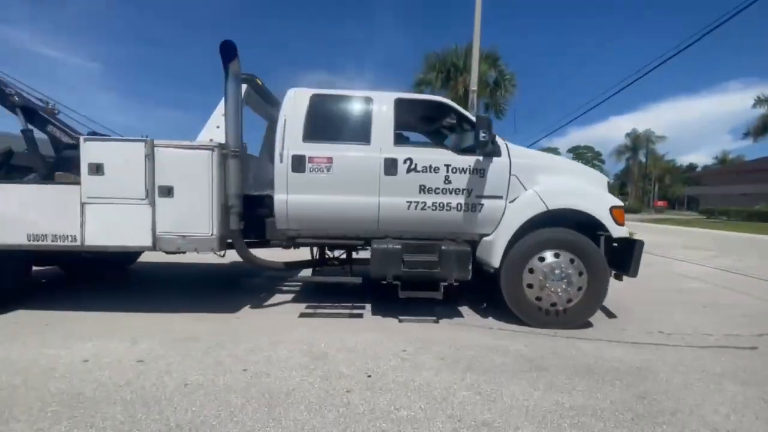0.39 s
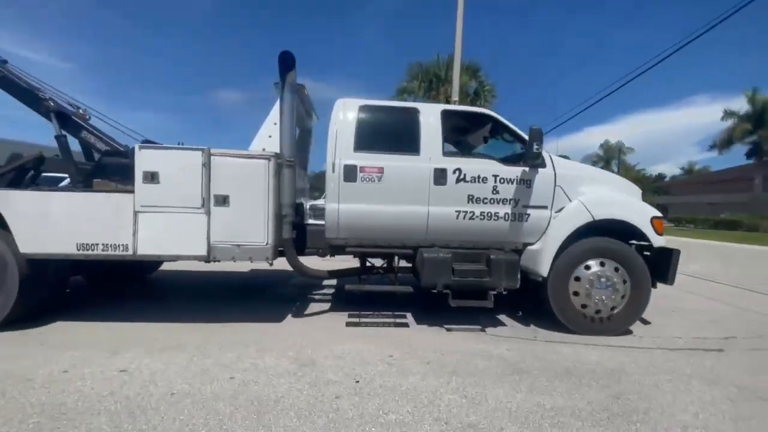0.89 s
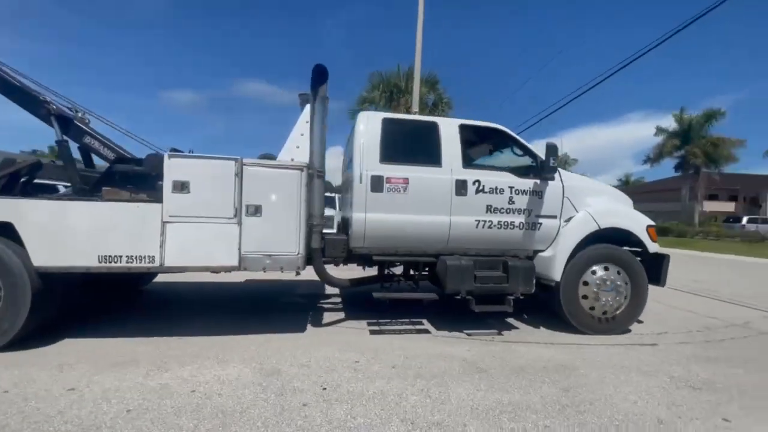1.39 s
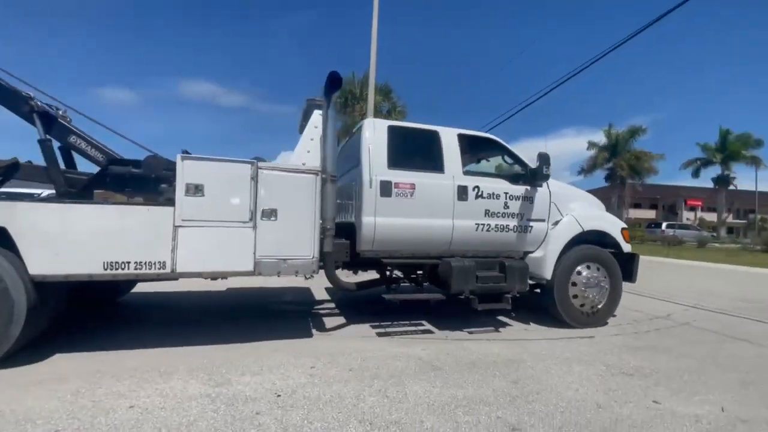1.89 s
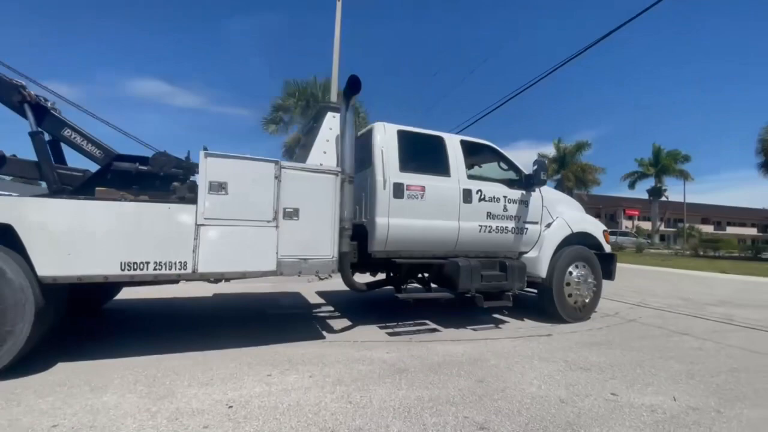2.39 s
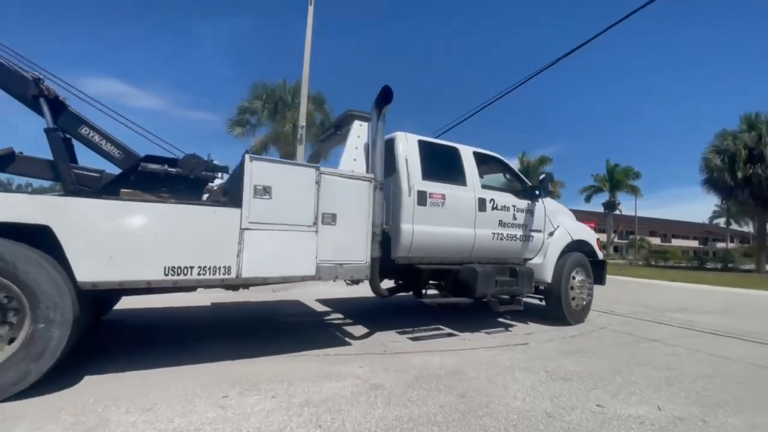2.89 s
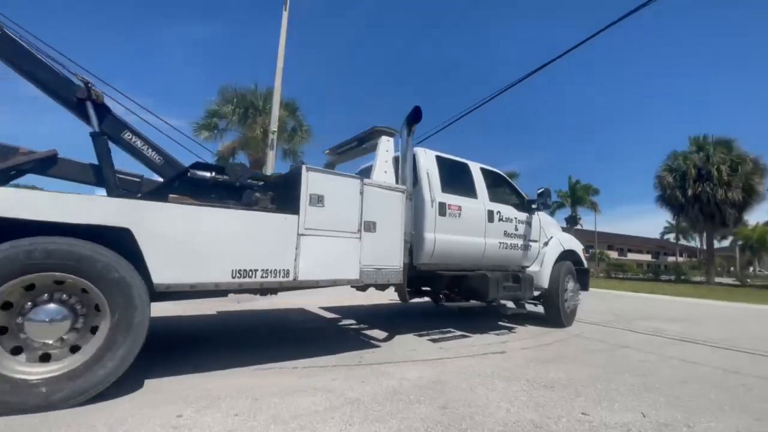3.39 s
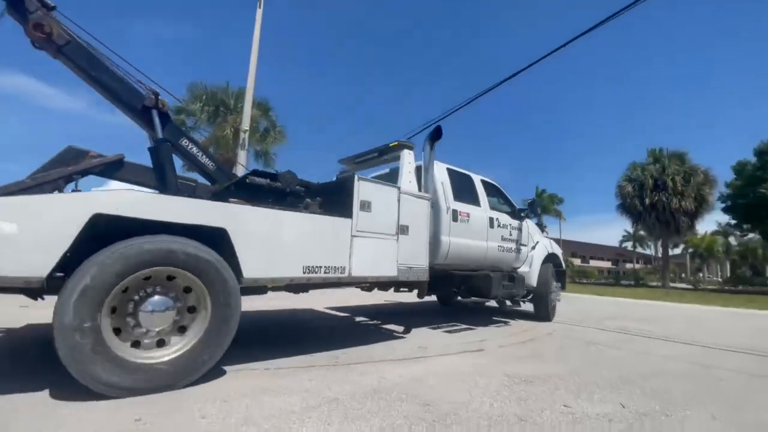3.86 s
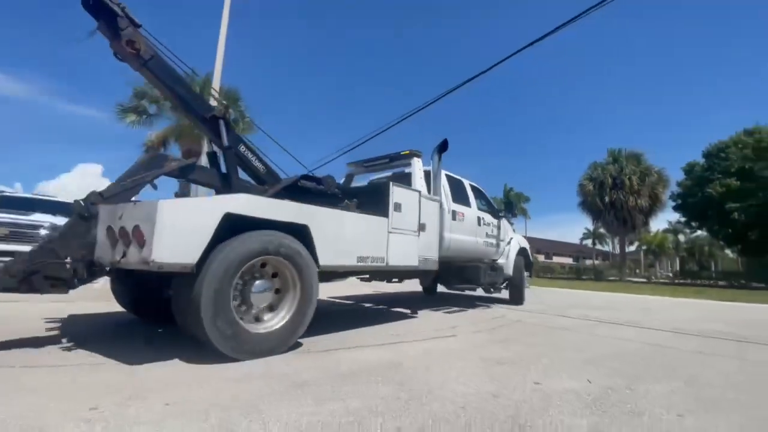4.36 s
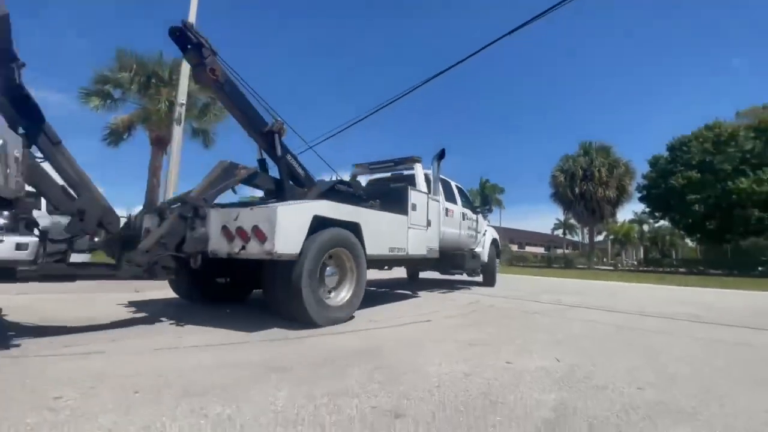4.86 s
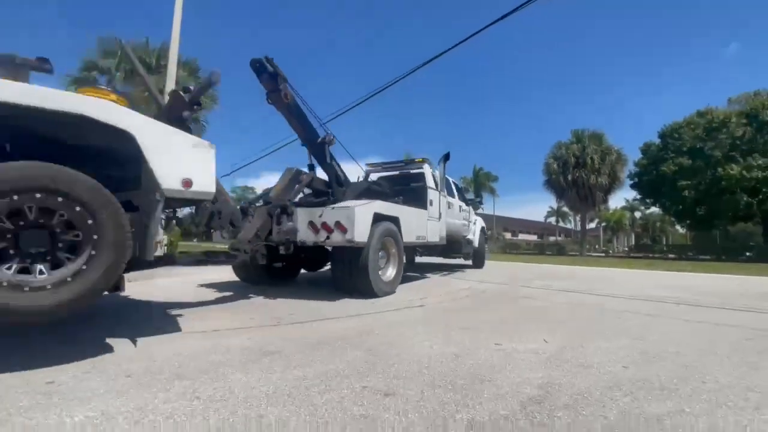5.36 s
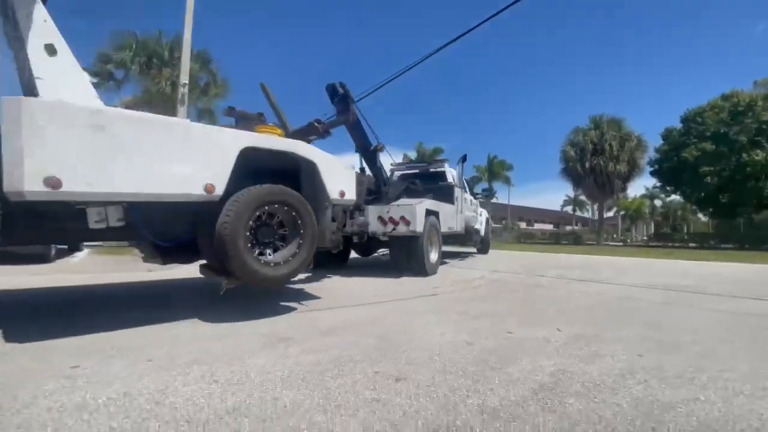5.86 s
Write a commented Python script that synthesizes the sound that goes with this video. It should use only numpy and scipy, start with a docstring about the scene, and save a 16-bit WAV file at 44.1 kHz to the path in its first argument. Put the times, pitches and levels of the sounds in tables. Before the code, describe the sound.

Close diesel truck clatters along with a thin turbo whistle and small chassis squeaks, then accelerates off, its growl climbing in pitch before fading slightly.

```python
"""A six-cylinder diesel truck rolls slowly past on a concrete road: hum of low engine orders, exhaust puffs,
combustion knock ringing the block, rattle, valve ticks, noise hiss and a turbo whine near 3.5 kHz.
Short chassis squeaks and clinks come at 1.6-2.5 s, one more clink at 4.1 s. From about 2.9 s the engine
pulls away under load: firing rate and whine climb, road-echo notches sweep up, and the level falls at the end.
A two-port phone microphone hears it directly and through scattering."""
import sys
import numpy as np
from scipy import signal
from scipy.fft import rfft, irfft, next_fast_len
from scipy.io import wavfile
from scipy.ndimage import uniform_filter1d

SR = 44100
rng = np.random.default_rng(int(sys.argv[2]) if len(sys.argv) > 2 else 0)


def dump_mix(stems):
    """Bounce the given channels to the path in sys.argv[1] as a 16-bit WAV at rate SR."""
    frames = np.atleast_2d(stems).T  # one column per channel
    limited = np.clip(frames, -1, 1)  # hard clip at full scale
    pcm = np.round(limited * 32767).astype(np.int16)
    wavfile.write(sys.argv[1], SR, pcm)


def to_linear_factor(level_db):
    """Convert decibel levels (scalar or array-like) to linear amplitude factors."""
    exponent = np.asarray(level_db, float) / 20
    return 10 ** exponent


N = 275625
T = np.arange(N) / SR
SIZE = next_fast_len(N + SR // 4)
HZ = np.maximum(np.arange(SIZE // 2 + 1) * SR / SIZE, 1)
JITTER_S = .0003   # spread of the click timing

# Engine speed. Each row: time in seconds, firings per second.
FIRINGS_PER_S = [(0.0, 37.2), (0.15, 38.935), (0.75, 40.561), (1.2, 40.365), (1.35, 42.083), (1.8, 41.116),
                 (2.1, 44.534), (2.4, 39.877), (2.85, 44.307), (3.15, 50.28), (3.45, 51.558), (3.6, 53.012),
                 (4.05, 61.85), (4.5, 67.373), (4.8, 72.764), (5.25, 78.639), (5.55, 81.527),
                 (6.25, 86.526)]
# Truck path. Each row: time in seconds, first notch of the road echo in Hz, firings by which the knock
# trails the exhaust (negative: leads), view (0 beside, 1 passing, 2 behind).
TRUCK_PATH = [(0, 133, -0.0037, 0), (1, 128, -0.0041, 0), (2.5, 142.8, 0.036, 0.19),
              (3.1, 158, -0.26, 0.57), (3.4, 176, -.38, 0.87), (3.95, 224, -.6, 1.09),
              (4.3, 270, -.75, 1.46), (4.7, 340, -0.89, 2.18), (5, 393, -1.02, 2.23),
              (6.25, 480, -0.9, 1.87)]
# Engine effort, falling with distance at the end. Each row: time in seconds, level in dB.
EFFORT_DB = [(0, 2), (.07, -2.5), (.54, 3.5), (1.51, -0.5), (1.95, 3.5), (2.39, -0.5), (2.49, 6.5),
             (2.68, -1), (3.1, 5.5), (3.5, 3.5), (3.88, 1.1), (4.21, 2), (4.49, 6), (5.01, 6.5), (5.64, 0),
             (6.0, -5.5), (6.25, -6.5)]
# Layers in the order puff, knock, rattle, clatter, hiss. Each row: level in dB beside, passing, behind,
# share of the effort followed.
LAYER_LEVELS = [(-28, -20.5, -25.5, 0.18), (-26.5, -21.5, -25.5, 0.65), (-28, -27, -30.5, 0.38),
                (-31.5, -34, -40, 0.63), (-29.5, -30, -33.5, 0.56)]
# Cylinder strengths. Each row: relative knock in dB beside, passing, behind, relative exhaust puff in dB,
# relative valve tick in dB before the view evens it.
CYLINDER_STRENGTHS = [(-6, 0, 0, 0, -12), (-4.5, -11, -9, -5, -10), (-2.5, -8, -2, -4, -12),
                      (-8, -10, -6, -7, -1), (-3.5, -13, -9, -1, 0), (0, -2.5, -2, -6, -8)]
# Deeper knock by cylinder. Each row: relative level in dB beside, passing, behind.
DEEP_KNOCK_STRENGTHS = [(0, 0, 0), (-8, -11, -7), (-2.5, -9, -3.5), (-8, -13, -8), (-10, -13, -12),
                        (-2.5, -3, -1.5)]

# Hum orders. Each row: multiple of the firing rate, phase in radians, turns of phase slip as the truck passes.
HUM_ORDERS = [(1, -.2, 0), (1.5, .7, .35), (2, -.3, 1.1), (2.5, 1.8, .6), (3, 3, .95), (3.5, 2.5, 0),
              (4, -2.6, 1.9), (4.5, 1.1, 2.2), (8 / 3, 0, 0), (17 / 6, 2.2, 0), (19 / 6, -2.5, 0)]
# Hum levels, rows as in HUM_ORDERS. Each row: level in dB beside, passing, behind, waver in dB (held to 0..3).
HUM_LEVELS = [(-38, -14.5, -19.5, 1.4), (-36, -40, -46, 3.5), (-23.5, -30, -24, 1.2),
              (-40.5, -38, -43, 4.5), (-28.5, -31.5, -22.5, 0.8), (-39.5, -37, -31.5, 2.5),
              (-38, -46.5, -47, 3.5), (-54, -40, -54, 0), (-53, -47, -47, 8), (-65, -62, -35, -4),
              (-40, -34.5, -38.5, 4)]
# Brief dips and swells of one order. Each row: middle in seconds, multiple of the firing rate,
# half-length to 1/e in seconds, change in dB.
HUM_CHANGES = [(1.536, 2, 0.048, -19.5), (1.65, 4, 0.23, 9), (2.24, 4, 0.45, 8), (4.75, 3, 0.24, 3.5),
               (2.3, 1.5, 0.02, 5), (2.9, 1, 0.12, 5), (2.96, 2, 0.13, 6), (3.2, 3, 0.076, 4),
               (4.2, 3, .12, -9), (4.2, 2, .15, 0), (3.08, 4.5, 0.23, 18), (0.25, 3, 1, -11.5),
               (5.45, 3, 0.47, 1.5), (6.08, 3, 0.53, -3.5), (6, 3.5, 0.19, -9), (3.62, 1, 0.079, -0.5),
               (4.6, 3, 0.054, -17), (5.3, 1, 0.066, -1.5)]
# Exhaust puff spectrum. Each row: frequency in Hz, relative level in dB beside or behind, the same passing.
PUFF_SPECTRUM = [(28, -41, -39), (45, -17, -9), (110, -3, 0), (162, 0, -5.5), (207, 5, 2.5),
                 (268, -8.5, -2.5), (340, -5.5, -3.5), (420, -14, -7.5), (500, -13, -13.5), (925, -48, -42)]
# Exhaust growl swelling under load. Each row: time in seconds, added level in dB.
GROWL_DB = [(0, -1.4), (2.8, 0.5), (3.05, 3), (3.55, 1), (3.75, -1), (4.3, -1), (4.6, 2.1), (6.25, 1.5)]
# Block modes of the deeper knock. Each row: centre in Hz, width in Hz, relative level in dB beside,
# passing, behind.
DEEP_KNOCK_MODES = [(597.6, 66, -5, -2, -6.5), (692, 70, -1.5, 5, 11)]
# Block modes of the brighter knock. Columns as in DEEP_KNOCK_MODES.
BRIGHT_KNOCK_MODES = [(759, 76, -0.5, 9, 0.5), (813, 70, -1.5, 5, -25)]
# Rattle resonances. Each row: centre in Hz, width in Hz, relative level in dB.
RATTLE_RESONANCES = [(1097, 214, 0.5), (1200, 113, 5.5), (1282, 97, 2)]
# Clatter resonances ahead of the behind view. Each row: centre in Hz, width in Hz, relative level in dB.
CLATTER_RESONANCES = [(1790, 120, 1), (2198, 69, 5), (4700, 130, -9)]
# Clatter resonances from behind. Each row: centre in Hz, width in Hz, relative level in dB.
CLATTER_BEHIND_RESONANCES = [(1580, 110, 4.5), (2000, 160, 5), (2280, 210, 0.5), (2920, 120, 1.5),
                             (3810, 76, -5.5)]
# Valve tick resonances. Each row: centre in Hz, width in Hz, relative level in dB.
TICK_RESONANCES = [(2604, 120, 4.5), (3052, 210, -4)]
# Resonances sliding in pitch, likely peaks of an echo comb as the truck passes. Each row: time in seconds,
# pitch factor of clatter, of knock.
PITCH_SLIDE = [(0, 1.001, .99), (1.2, .999, .995), (1.7, .97, 1.001), (2.1, .99, 1.01), (2.5, 1.03, 1.03),
               (3, 1.04, 1.06), (3.4, 1.001, 1.001), (4.2, .999, .98), (5, 1.001, 1.01), (6.25, 1.01, 1.04)]
# Brief narrow rings, from about 1 to 6 kHz. Each row: middle in seconds, half-length to 1/e in seconds,
# centre in Hz, width in Hz of each of two stages, level in dB.
CLATTER_RINGS = [(3.048, .07, 4030, 90, -38), (3.35, 0.28, 6270, 180, -44), (4.45, .1, 6100, 250, -49),
                 (4.6, .25, 1080, 120, -34), (4.82, .1, 2330, 250, -39), (5.9, .3, 960, 50, -39),
                 (3.35, .3, 5280, 200, -46), (3.75, .2, 1100, 120, -35), (5.5, 0.23, 3890, 108, -53),
                 (5.35, .12, 2800, 60, -43)]
# Turbo whine. Each row: time in seconds, mean pitch in Hz, level in dB, share of power in a clean tone.
TURBO_WHINE = [(0, 3600, -50, .5), (.6, 3510, -41.5, 0.66), (1.2, 3497, -39.5, 0.6),
               (1.8, 3420, -38.5, 0.55), (2.2, 3490, -40.5, 0.6), (2.45, 3510, -36.5, 0.75),
               (2.85, 3594, -40, 0.8), (2.95, 3660, -43, 0.6), (3.03, 3750, -41, 0.45),
               (3.15, 3860, -36, 0.5), (3.45, 4120, -35, 0.65), (3.7, 4300, -50, .7), (4.05, 4950, -51, .6),
               (4.2, 5060, -41, 0.55), (4.3, 5210, -39, .55), (4.42, 5530, -36, .55),
               (4.56, 5670, -35, 0.55), (4.66, 5830, -39, .6), (4.76, 6050, -38.5, 0.6),
               (4.95, 6300, -56, .5), (5.2, 6680, -46.5, .5), (5.45, 6840, -44.5, 0.56),
               (5.62, 7200, -48, .6), (5.8, 7440, -49, .6), (6.25, 7550, -60, .6)]
# Chassis squeaks. Each row: start in seconds, length in seconds, settled pitch in Hz, peak in dB,
# second partial in dB relative to the first.
CHASSIS_SQUEAKS = [(1.6, .15, 4400, -33, 1.5), (1.812, .035, 4760, -32, -30), (1.81, .045, 7380, -42, -30)]
# Metal clinks. Each row: start in seconds, main resonance in Hz, drive level in dB.
METAL_CLINKS = [(1.604, 9100, -16.5), (1.725, 6400, -25), (1.885, 7300, -27), (2.449, 6020, -16.5),
                (4.097, 5330, -20)]
# Hiss spectrum. Each row: frequency in Hz, relative density in dB.
HISS_SPECTRUM = [(300, 5), (900, 5.5), (1500, -16.5), (2100, -0.5), (3000, -6), (4200, -11.5), (4700, -10),
                 (5200, -7.5), (6200, -9.5), (7800, -13), (9600, -6.5), (12500, -39.5)]
# Scattering. Each row: frequency in Hz, scattered share of power.
SCATTERED_SHARE = [(60, 0), (200, .012), (400, .04), (800, .05), (1200, .22), (2500, .22), (5000, .35),
                   (9000, .18), (10000, 0)]
# Microphone ports. Each row: frequency in Hz, left phase lead in radians.
PORT_PHASE = [(30, .07), (120, .15), (400, .55), (700, 1.0), (1300, .6), (2400, 1.1), (3200, 2), (4000, .2),
              (5000, 3), (6500, 5.6), (7500, 7.2), (8500, 8.5), (9600, 10), (10500, 4 * np.pi)]
# Port colour. Each row: frequency in Hz, left minus right in dB with the truck beside, with it behind.
PORT_BALANCE = [(60, 0, -.5), (200, -.5, -1.5), (360, -.5, -1), (640, 2, 2), (1170, 3, 4.5), (2110, 0, 1),
                (3820, 1, 3), (6000, 3, 8), (8500, -4, -1), (11000, 2, 2)]
# Overall spectrum, with a gap near 10 kHz and a narrow band near 11 kHz. Each row: frequency in Hz, gain in dB.
OVERALL_SPECTRUM = [(20, -21), (32, -13), (45, 1), (9600, 1.5), (9750, -50), (10700, -15.5), (11000, -1),
                    (11600, 2), (11900, -31), (12200, -86)]


def rms_one(x):
    """Scale to rms 1."""
    return x / np.sqrt(np.mean(x ** 2) + 1e-20)


def in_time(rows):
    """Columns of a table, one value a sample."""
    s, *columns = np.transpose(rows)
    return [np.interp(T, s, c) for c in columns]


def at_hz(points, column=1):
    """A table column on the spectrum grid, interpolated over log frequency."""
    points = np.array(points)
    return np.interp(np.log(HZ), np.log(np.maximum(points[:, 0], 1)), points[:, column])


def by_view(view, row):
    """Blend the beside, passing and behind values of a row."""
    return np.interp(view, range(3), row[:3])


def shaped(x, response):
    """Filter by a response on the spectrum grid."""
    return irfft(rfft(x, SIZE) * response, SIZE)[..., :N]


def evened(x, seconds):
    """Divide out the slow level so that a level curve can be set."""
    return x / np.sqrt(uniform_filter1d(x ** 2, int(seconds * SR)) + 1e-20)


def waver():
    """Slow random curve, 2.43 knots a second, spread about 1."""
    knots_per_s = 2.43
    knots = rng.standard_normal(int(N / SR * knots_per_s) + 2)
    curve = np.interp(T * knots_per_s, np.arange(len(knots)), knots)
    return uniform_filter1d(curve, SR // 20) * 1.2


def swell(middle_s, half_length_s):
    """Bell in time, 1 at its middle."""
    return np.exp(-((T - middle_s) / half_length_s) ** 2)


def resonances(x, modes):
    """Parallel two-pole resonators with alternating signs."""
    out = 0
    for k, (hz, width_hz, db) in enumerate(modes):
        r = np.exp(-np.pi * width_hz / SR)
        b = (1 - r * r) / 2 * np.array([1, 0, -1])
        a = [1, -2 * r * np.cos(2 * np.pi * hz / SR), r * r]
        out = out + (-1) ** k * to_linear_factor(db) * signal.lfilter(b, a, x)
    return out


def sliding(x, modes, factor):
    """Steep resonators whose centres follow a pitch factor: shift down, low-pass twice, shift back."""
    out = 0
    for k, (hz, width_hz, db) in enumerate(modes):
        r = np.exp(-1.55 * np.pi * width_hz / SR)   # 1.55: two stages narrow the band
        turn = np.exp(2j * np.pi * hz * np.cumsum(factor) / SR)
        low = signal.lfilter([(1 - r) ** 2], [1, -2 * r, r * r], x / turn)
        out = out + (-1) ** k * to_linear_factor(db) * 2 * (low * turn).imag
    return out


def firings(count, strength_db, spread_db):
    """One click at each whole firing, a little early or late; strength_db is cylinders x samples."""
    at = np.flatnonzero(np.diff(np.floor(count)) > 0)
    cylinder = np.floor(count[at + 1]).astype(int) % 6
    level_chance, time_chance = rng.standard_normal((2, len(at)))
    place = np.clip(at + (JITTER_S * SR * time_chance).astype(int), 0, N - 1)
    clicks = np.zeros(N)
    clicks[place] = to_linear_factor(strength_db[cylinder, at] + spread_db * level_chance)
    return clicks


def burst(clicks, decay_s, rough, bed):
    """Clicks with decaying noise puffs over a steady noise bed; rough is the noise share of power."""
    r = np.exp(-1 / (decay_s * SR))
    gate = rms_one(signal.lfilter([1], [1, -r], clicks)) + bed
    noise = rms_one(gate * rng.standard_normal(N))
    return np.sqrt(1 - rough) * rms_one(clicks) + np.sqrt(rough) * noise


def road_echo(x, notch_hz, gain, cut_hz):
    """The road sends a duller copy half a notch period later."""
    late = np.interp(T - .5 / notch_hz, T, x)
    return x + gain * signal.sosfilt(signal.butter(1, cut_hz, fs=SR, output="sos"), late)


def hum(count, trail, view):
    """Clean low orders; some slip in phase as the exhaust and the block trade places."""
    swing = (trail[0] - trail) / (trail[0] - trail[-1])
    out = 0
    for row, (order, phase, turns) in zip(HUM_LEVELS, HUM_ORDERS):
        db = by_view(view, row) + np.clip(row[3], 0, 3) * waver()
        for middle_s, which, half_length_s, change_db in HUM_CHANGES:
            if which == order:
                db = db + change_db * swell(middle_s, half_length_s)
        tone = np.cos(2 * np.pi * (order * count + turns * swing) + phase)
        out = out + np.sqrt(2) * to_linear_factor(db) * tone
    return out


def exhaust_puffs(count, notch_hz, view, puff_strength_db):
    """Each firing puffs gas out of the exhaust: click plus noise, coloured by view."""
    clicks = firings(count, puff_strength_db[:, None] * np.ones((1, N)), spread_db=1.0)
    rough, bed = by_view(view, (.33, .5, .18)), by_view(view, (1.8, 4, 1.8))
    puffs = burst(clicks, decay_s=.008, rough=rough, bed=bed)
    passing = 1 - np.abs(view - 1)
    aside = shaped(puffs, to_linear_factor(at_hz(PUFF_SPECTRUM)))
    near = shaped(puffs, to_linear_factor(at_hz(PUFF_SPECTRUM, column=2)))
    puffs = (1 - passing) * aside + passing * near
    return road_echo(puffs, notch_hz, gain=0.38, cut_hz=1340)


def ring_block(clicks, modes, view, factor):
    """Combustion blows ring the modes of the block."""
    blows = burst(clicks, decay_s=.003, rough=.06, bed=3.0)
    out = 0
    for k, (hz, width_hz, *view_db) in enumerate(modes):
        ring = sliding(blows, [(hz, width_hz, 0)], factor)
        out = out + (-1) ** k * to_linear_factor(by_view(view, view_db)) * ring
    return out


def knock(block_count, notch_hz, view, bright_db, factor):
    """Two combustion blows per firing, the brighter first, each ringing its own block modes."""
    lead_firings = 0.1216
    early_view = np.maximum(view, np.minimum(4 * view, 1))   # deeper pattern reaches passing sooner
    deep_db = np.array([by_view(early_view, row) for row in DEEP_KNOCK_STRENGTHS])
    deep_clicks = firings(block_count, deep_db, spread_db=.8)
    bright_clicks = firings(block_count + lead_firings, bright_db, spread_db=.8)
    deep = ring_block(deep_clicks, DEEP_KNOCK_MODES, view, factor)
    bright = ring_block(bright_clicks, BRIGHT_KNOCK_MODES, view, factor)
    return road_echo(deep + bright, notch_hz, gain=.95, cut_hz=6000)


def rattle(taps, notch_hz, view):
    """Taps of pistons and gears ring low metal resonances."""
    noise = burst(taps, decay_s=.008, rough=.85, bed=by_view(view, (3.5, 2, 2.5)))
    return road_echo(resonances(noise, RATTLE_RESONANCES), notch_hz, gain=0.42, cut_hz=290)


def clatter(rap, ticks, behind, factor):
    """Taps and valve ticks ring bright resonances; another set takes over from behind."""
    tick_noise = burst(ticks, decay_s=.012, rough=.85, bed=.8)
    valves = sliding(tick_noise, TICK_RESONANCES, factor)
    ahead = sliding(rap, CLATTER_RESONANCES, factor) + valves
    return (1 - behind) * ahead + behind * resonances(rap, CLATTER_BEHIND_RESONANCES)


def rings(rap):
    """The clatter briefly finds a narrow resonance."""
    out = 0
    for middle_s, half_length_s, hz, width_hz, db in CLATTER_RINGS:
        mode = [(hz, width_hz, 0)]
        ring = rms_one(resonances(resonances(rap, mode), mode))
        out = out + to_linear_factor(db) * swell(middle_s, half_length_s) * ring
    return out


def turbo(block_count):
    """A whistle, part clean and part noisy, that swells and bends once per firing, in step with the knock."""
    hz, db, clean = in_time(TURBO_WHINE)
    clean = np.clip(clean, 0, 1)
    low_pass = signal.butter(2, 130., fs=SR, output="sos")
    real, imag = signal.sosfilt(low_pass, rng.standard_normal((2, N)))
    wobble = rms_one(real) + 1j * rms_one(imag)
    pulse = 2 * np.pi * block_count - 2.75
    pulse_index = np.round(pulse / (2 * np.pi)).astype(int)
    each_db = 1.5 * rng.standard_normal(int(block_count[-1]) + 2)[pulse_index]
    turn = np.exp(2j * np.pi * np.cumsum(hz * (1 + .009 * np.sin(pulse))) / SR)
    line = (np.sqrt(2 * clean) + np.sqrt(1 - clean) * wobble) * turn
    pulse_db = 5.5 * np.cos(pulse) + uniform_filter1d(each_db, SR // 300)
    return to_linear_factor(db) * rms_one(line.real * to_linear_factor(pulse_db))


def chassis():
    """Short squeaks of a rubbing joint, starting sharp and peaking late, and small metal clinks."""
    sharp_share, lateness = .02, 1.5
    out = np.zeros(N)
    for start_s, length_s, hz, db, second_db in CHASSIS_SQUEAKS:
        done = np.clip((T - start_s) / length_s, 0, 1)
        rise = np.sin(np.pi * done ** lateness)
        phase = 2 * np.pi * np.cumsum(hz * (1 + sharp_share * (1 - done) ** 3)) / SR
        second = to_linear_factor(second_db) * rise ** 2 * np.sin(2 * phase)
        out += to_linear_factor(db) * rise * (np.sin(phase) + second)
    for start_s, hz, db in METAL_CLINKS:
        decay = (T > start_s) * np.exp(-np.maximum(T - start_s, 0) / 0.0075)
        noise = decay * rng.standard_normal(N)
        out += to_linear_factor(db) * resonances(noise, [(hz, 1500, 0), (hz * 0.81, 900, -6)])
    return out


def hiss(ticks, notch_hz):
    """Fan and road noise over a steady bed, puffing with the valve ticks."""
    noise = burst(ticks, decay_s=.011, rough=.97, bed=2.0)
    noise = shaped(noise, to_linear_factor(at_hz(HISS_SPECTRUM)))
    return road_echo(noise, notch_hz, gain=0.16, cut_hz=410)


def scattered(x, decay_s):
    """Walls and kerbs return a short, changing tail, in opposite phase at the ports; only its phase is used."""
    frames = signal.stft(x, nperseg=4096)[2]
    tails = rng.standard_normal((1024, frames.shape[1])) * np.exp(-T[:1024, None] / decay_s)
    turns = rfft(uniform_filter1d(tails, size=2, axis=1), 4096, axis=0)
    tail = signal.istft(frames * turns / np.abs(turns), nperseg=4096)[1][:N]
    return tail * [[1], [-1]]


def scene():
    """The truck as one source, heard directly and scattered by its surroundings, plus the chassis."""
    count = np.cumsum(in_time(FIRINGS_PER_S)[0]) / SR
    notch_hz, trail, view = in_time(TRUCK_PATH)
    block_count = count - trail
    behind = np.clip(view - .5, 0, 1)
    clatter_slide, knock_slide = in_time(PITCH_SLIDE)
    effort_db, growl_db = in_time(EFFORT_DB)[0], in_time(GROWL_DB)[0]
    layer_db = [by_view(view, row) + row[3] * effort_db for row in LAYER_LEVELS]
    puff_db, knock_db, rattle_db, clatter_db, hiss_db = layer_db

    *knock_by_view, puff_strength, tick_strength = np.transpose(CYLINDER_STRENGTHS)
    bright_db = np.array([by_view(view, row) for row in np.transpose(knock_by_view)])
    taps = firings(block_count - .4, bright_db / 3, spread_db=2.5)   # pistons and gears follow each knock
    ticks = firings(block_count - .5, tick_strength[:, None] * (1 - .7 * behind), spread_db=2.0)
    rap = burst(taps + ticks, decay_s=.005, rough=.75, bed=1.5)

    puffs = exhaust_puffs(count, notch_hz, view, puff_strength)
    knocks = knock(block_count, notch_hz, view, bright_db, knock_slide)
    truck = hum(count, trail, view)
    truck = truck + to_linear_factor(puff_db + growl_db) * evened(puffs, seconds=0.96)
    truck = truck + to_linear_factor(knock_db) * evened(knocks, seconds=0.77)
    truck = truck + to_linear_factor(rattle_db) * evened(rattle(taps, notch_hz, view), seconds=0.1)
    truck = truck + to_linear_factor(clatter_db) * evened(clatter(rap, ticks, behind, clatter_slide), seconds=0.9)
    truck = truck + rings(rap) + turbo(block_count)
    truck = truck + to_linear_factor(hiss_db) * rms_one(hiss(ticks, notch_hz))

    share = np.clip(at_hz(SCATTERED_SHARE), 0, 1)
    direct = shaped(truck, np.sqrt(1 - share))
    diffuse = shaped(scattered(truck, decay_s=.003), np.sqrt(share))
    return direct + diffuse + chassis()


def ports(dry):
    """Each port has its phase and colour; the colour changes as the phone turns after the truck."""
    side = np.array([[.5], [-.5]])
    phase = np.exp(1j * side * at_hz(PORT_PHASE))
    beside = shaped(dry, phase * to_linear_factor(side * at_hz(PORT_BALANCE, column=1)))
    behind = shaped(dry, phase * to_linear_factor(side * at_hz(PORT_BALANCE, column=2)))
    turned = np.clip((T - 2.6) / .5, 0, 1)
    return (1 - turned) * beside + turned * behind


def spectrum_with_flicker(x):
    """Overall spectrum; the band above 10.2 kHz flickers."""
    gain = to_linear_factor(at_hz(OVERALL_SPECTRUM))
    flutter = signal.sosfilt(signal.butter(2, 14., fs=SR, output="sos"), rng.standard_normal(N))
    flicker = np.clip(rms_one(flutter) + .6, .08, 1.7)
    return shaped(x, (HZ <= 10200) * gain) + shaped(x, (HZ > 10200) * gain) * flicker


def top_cut(x):
    """Nothing passes above the cut-off."""
    return signal.sosfilt(signal.butter(12, 13130, fs=SR, output="sos"), x)


def record(dry):
    """Two-port microphone: port differences, rounded peaks, then the overall spectrum."""
    x = ports(dry)
    x = .93 * np.tanh(x / .93)
    mix = spectrum_with_flicker(x)
    return top_cut(mix)


dry = scene()
out = record(dry)
dump_mix(out)
```